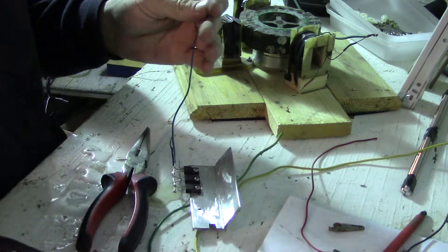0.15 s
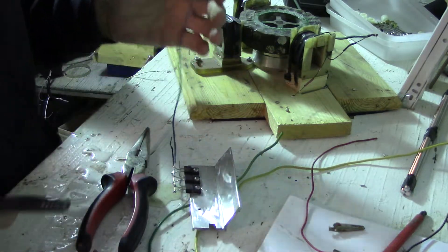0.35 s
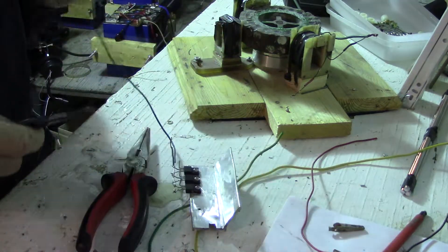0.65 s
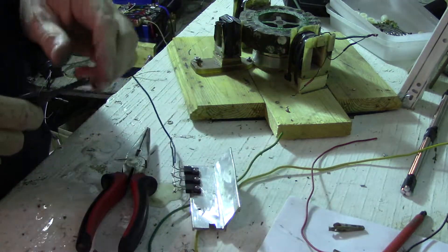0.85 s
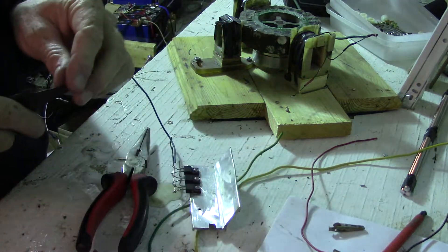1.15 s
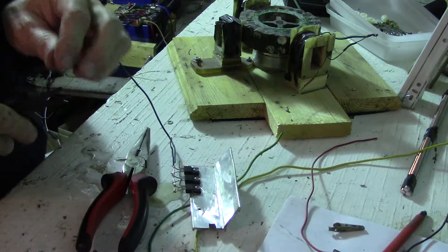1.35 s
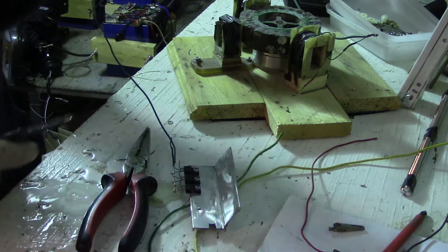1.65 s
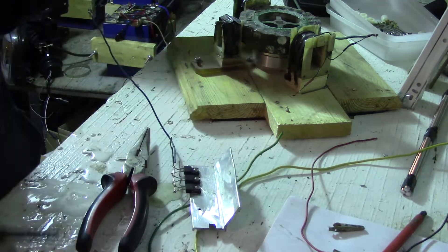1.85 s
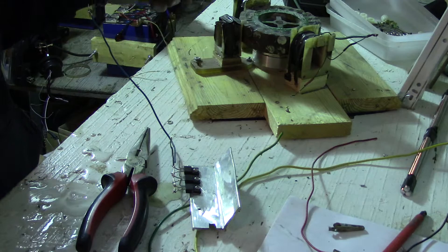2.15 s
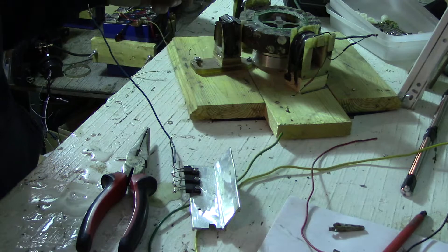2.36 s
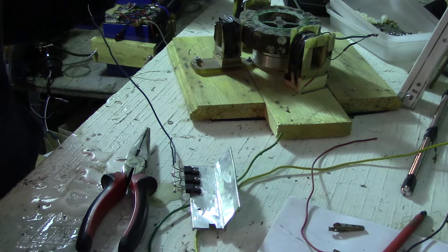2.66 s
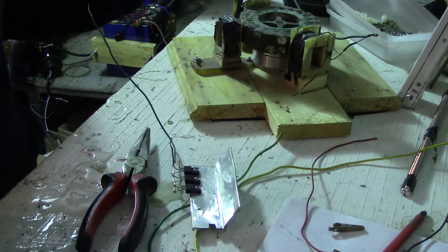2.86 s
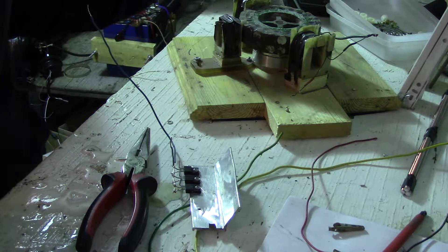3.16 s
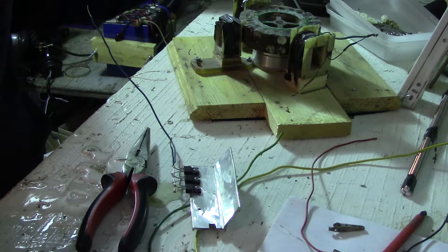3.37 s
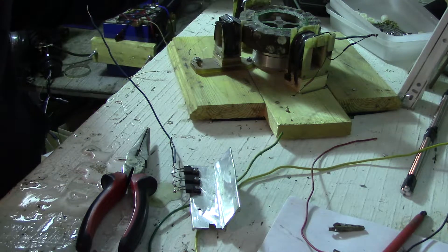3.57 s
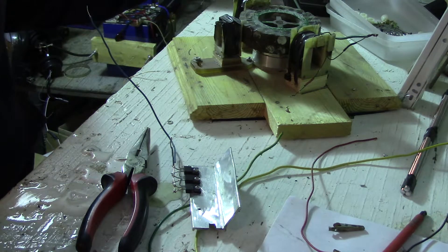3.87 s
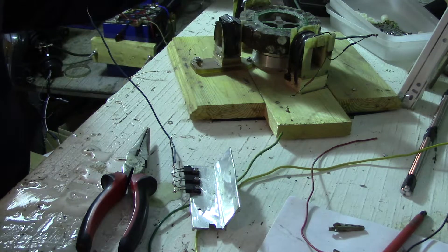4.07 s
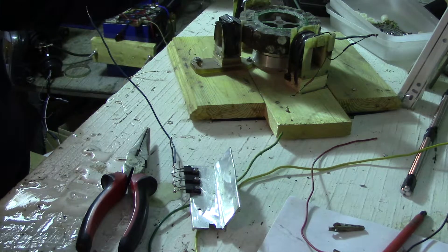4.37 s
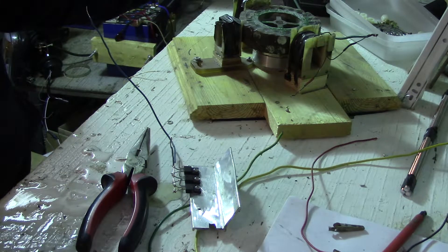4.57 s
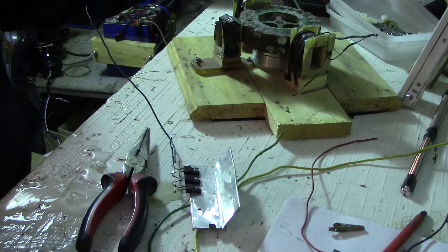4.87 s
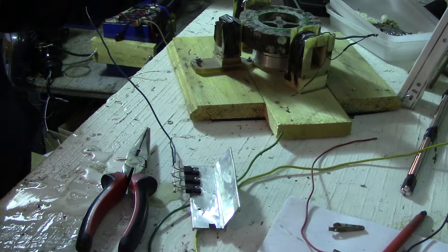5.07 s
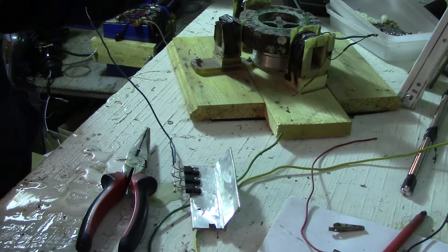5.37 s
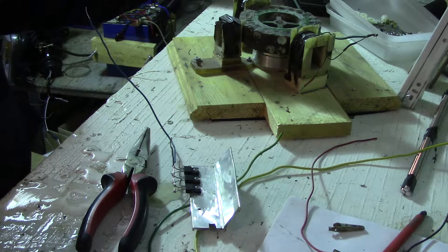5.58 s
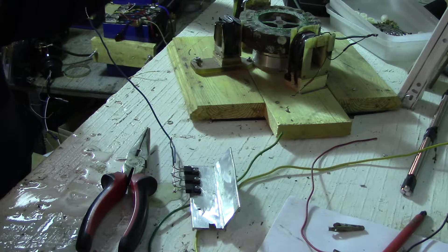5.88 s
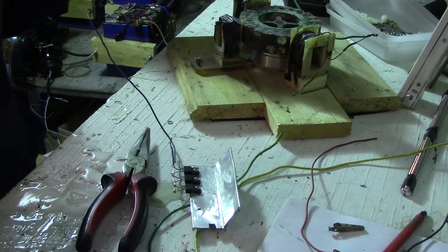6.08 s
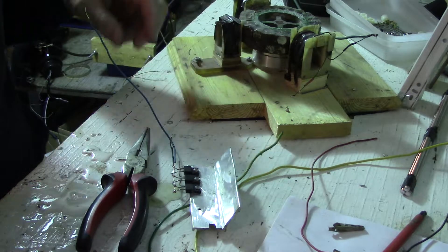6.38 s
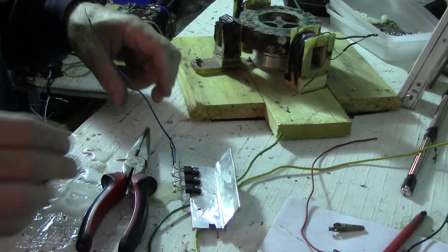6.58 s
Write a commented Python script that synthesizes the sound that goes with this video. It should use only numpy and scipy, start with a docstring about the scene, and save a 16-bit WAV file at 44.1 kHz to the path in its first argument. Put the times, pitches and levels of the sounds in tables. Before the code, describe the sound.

A transformer hums steadily while wire strippers snip and are put down, then a heavier tool drops and rattles on a workbench.

```python
"""Wire stripping at a workbench

Close up in a small room, a mains transformer hums and buzzes throughout. Hands and wire rub and
softly bump the bench, a sleeve brushes past. Wire strippers snip and are laid down, and wire ticks.
Near the end a heavier tool drops on the bench top, bounces and rattles to rest."""
import sys
import numpy as np
from scipy import signal
from scipy.fft import rfft, irfft
from scipy.io import wavfile

SR = 44100
rng = np.random.default_rng(int(sys.argv[2]) if len(sys.argv) > 2 else 0)


def master(y):
    """Save y as 16-bit WAV."""
    cut = np.clip(np.atleast_2d(y).T, -1, 1)
    pcm = np.round(cut * 32767)  # scale
    wavfile.write(sys.argv[1], SR, pcm.astype(np.int16))


N = 296793
T = np.arange(N) / SR
RING = T[:SR // 2]  # time axis of a single hit
TOP_HZ = 15500


def undb(db):
    """Decibels to gain."""
    return 10 ** (np.asarray(db) / 20)


def attack_unit(x):
    """Scale to rms 1 over the first 10 ms."""
    return x / np.std(x[:SR // 100])


def fade(t60):
    """Exponential decay, 60 dB down after t60 seconds."""
    return np.exp(-np.log(1000) * RING / t60)


def soften(x, hz):
    """Low-pass: a softer contact passes less treble."""
    return signal.sosfilt(signal.butter(2, min(hz, SR / 2 - 500), fs=SR, output="sos"), x)


def band(x, low_hz, high_hz):
    """Band-pass: a small contact gives little bass, a soft one little treble."""
    return soften(signal.sosfilt(signal.butter(2, low_hz, "high", fs=SR, output="sos"), x), high_hz)


def colour_db(curve, hz):
    """Read an EQ curve on a log-frequency axis."""
    points_hz, db = np.transpose(curve)
    return np.interp(np.log(hz + 1), np.log(points_hz), db)


def colour(x, curve, size=2048):
    """Causal EQ, built from the cepstrum of the curve's log gain."""
    gain = undb(colour_db(curve, np.fft.rfftfreq(size, 1 / SR)))
    cepstrum = irfft(np.log(gain))
    cepstrum[1:size // 2] *= 2
    cepstrum[size // 2 + 1:] = 0
    impulse = irfft(np.exp(rfft(cepstrum)))
    return signal.fftconvolve(x, impulse)[:len(x)]


def noise(curve):
    """A scene-long noise bed of rms 1, shaped by an EQ curve."""
    bed = colour(rng.standard_normal(N), curve)
    return bed / np.sqrt(np.mean(bed ** 2))


def add(track, s, x):
    """Mix a sound into the track at time s."""
    start = max(int(s * SR), 0)
    track[start:start + len(x)] += x[:max(N - start, 0)]


def bounces(s, gap_s, ratio, count):
    """Times of repeated contacts: each gap is the one before times the ratio."""
    return s + np.append(0, np.cumsum(gap_s * ratio ** np.arange(count - 1)))


def ring(modes, wash, wash_db, wash_t60, crack_db, crack_t60):
    """One hit on an object: clear modes over a wash of dense ones that opens with a short crack."""
    tones = sum(undb(db) * np.sin(2 * np.pi * hz * RING) * fade(t60) for hz, db, t60 in modes)
    tones = band(tones, 0.74 * modes[0][0], 2 * modes[-1][0])  # little radiates outside the modes' range
    burst = rng.choice([-1, 1], len(RING)) * (fade(wash_t60) + undb(crack_db) * fade(crack_t60))
    return attack_unit(attack_unit(tones) + undb(wash_db) * attack_unit(colour(burst, wash)))


# The hum's strong partials: (harmonic number, level [dB])
HUM_PARTIALS = [(1, -79), (2, -62), (4, -66), (5, -76), (6, -77), (7, -81), (8, -64), (9, -61), (10, -61),
                (11, -68), (13, -73), (14, -74), (15, -72), (16, -66), (19, -67), (21, -77), (24, -74),
                (25, -78), (26, -74), (29, -73), (30, -71), (31, -76), (32, -75), (33, -79), (36, -72),
                (43, -75), (48, -78), (53, -75)]
# The fine buzz between and above them: (frequency [Hz], level per partial [dB])
BUZZ_CURVE = [(120, -81), (1500, -80), (2400, -81), (4000, -85), (6000, -88), (7500, -97), (10000, -104),
              (12300, -108), (13050, -89), (13350, -101), (13650, -93), (14100, -93), (14500, -102),
              (15500, -108)]
def transformer(hum_hz=120.02, dispersion=1.3, waver_db=.5):
    """The core flexes twice a mains cycle; its plates delay each partial differently, smearing it."""
    harmonics = np.arange(1, int(TOP_HZ / hum_hz))
    db = colour_db(BUZZ_CURVE, harmonics * hum_hz) + 2 * rng.standard_normal(len(harmonics))
    for harmonic, partial_db in HUM_PARTIALS:
        db[int(harmonic) - 1] = partial_db
    phase = np.cumsum(np.cumsum(dispersion + .4 * rng.standard_normal(len(harmonics))))
    cycle_at = np.linspace(0, 1, SR // 10)
    cycle = np.sqrt(2) * undb(db) @ np.cos(2 * np.pi * np.outer(harmonics, cycle_at) + phase[:, None])
    waver = np.interp(T, np.linspace(0, T[-1], 20), rng.standard_normal(20))
    return np.interp(T * hum_hz % 1, cycle_at, cycle) * undb(waver_db * waver)


# Room tone in the mid and in the side: (frequency [Hz], relative level [dB])
MID_AIR_EQ = [(30, 9.5), (80, -4), (220, 3.5), (500, 0.5), (1000, -4), (1400, -4), (1800, -8.5), (2300, -7),
              (3500, -12.5), (7000, -15.5), (11000, -23.5), (15500, -26)]
SIDE_AIR_EQ = [(30, 2), (300, 13), (1200, 5), (5000, -6), (15000, -31)]
def room_tone():
    """A faint, steady bed of air, as mid and side."""
    return undb(-59.5) * noise(MID_AIR_EQ), undb(-67.5) * noise(SIDE_AIR_EQ)


# The bench top's low boom: (frequency [Hz], relative level [dB], t60 [s])
BENCH_MODES = [(140, -6.5, 0.24), (180.7, -2, 0.18), (188.8, 16, 0.2), (207, -11, 0.23)]
# Its dense modes under a hand: (frequency [Hz], relative level [dB])
THUD_WASH = [(30, -5), (150, -3), (320, 0), (420, -2.5), (620, -4), (760, -14), (950, -20), (2000, -23),
             (6000, -44)]
def hand_bumps():
    """A soft hand meets the bench with a dull thud and settles in ever lighter touches."""
    out = np.zeros(N)
    first_db, loss_db = -34, 7
    for k, s in enumerate(bounces(.001, gap_s=.017, ratio=2.8, count=3)):
        thud = ring(BENCH_MODES, THUD_WASH, wash_db=7, wash_t60=0.2, crack_db=-10, crack_t60=.04)
        add(out, s, undb(first_db - loss_db * k) * thud)
    return soften(out, hz=1800)


# Rubs and soft low bumps: (time [s], length [s], level [dB], band centre [Hz])
TOUCH_CUES = [(.103, 0.024, -50, 480), (0.27, .036, -51.5, 385), (.395, .032, -53, 280),
              (2.942, 0.03, -57.5, 170), (4.337, 0.073, -48, 423), (4.402, 0.025, -47.5, 338),
              (6.054, 0.046, -43, 75)]
# The tone of these touches: (frequency [Hz], relative level [dB])
TOUCH_EQ = [(30, 11), (100, -6.5), (190, 2.5), (270, -2), (400, -1), (650, -9.5), (1400, -2.5), (2200, -5),
            (5000, 8), (12000, -14)]
def rubs_and_soft_bumps(grains_per_s=300, steady_level=0.73, width_octaves=2.3):
    """Short rubs and soft low bumps of hands and wire on the bench top, as bands of grainy noise."""
    out, edge = np.zeros(N), 2 ** (width_octaves / 2)
    for s, length, db, hz in TOUCH_CUES:
        pressure = np.sqrt(np.sin(np.pi * np.minimum(RING / length, 1)).clip(0))
        onsets = rng.random(len(RING)) < grains_per_s / SR
        grains = signal.lfilter([1], [1, -np.exp(-grains_per_s * 2 / SR)], onsets)
        touch = colour(rng.standard_normal(len(RING)) * (steady_level + grains) * pressure, TOUCH_EQ)
        for _ in range(2):  # a small, soft contact: both edges fall away steeply
            touch = band(touch, hz / edge, hz * edge)
        add(out, s, undb(db) * touch / np.std(touch[:int(length * SR)]))
    return out


# Sleeve swells: (peak time [s], half length [s], level [dB])
SLEEVE_CUES = [(0.515, 0.14, -55), (1.17, 0.3, -64), (3.5, 0.053, -61), (4.367, 0.054, -58),
               (6.025, 0.021, -53.5)]
# The tone of the cloth: (frequency [Hz], relative level [dB])
CLOTH_EQ = [(200, -5), (600, 8.5), (2000, 6), (3500, -4), (6000, -3), (11000, -13), (15500, -27)]
def sleeve():
    """Cloth swishes in smooth swells as the arm moves."""
    swells = sum(undb(db) * np.exp(-.5 * ((T - s) / half) ** 2) for s, half, db in SLEEVE_CUES)
    return swells * noise(CLOTH_EQ)


# The bright ping of the strippers' jaws: (frequency [Hz], relative level [dB], t60 [s])
JAW_MODES = [(2220, 5, 0.036), (3020, 2, .03), (3480, 12, 0.025), (3920, -2, 0.022), (4000, -2, 0.027),
             (4120, -14, 0.021), (5580, -9, .02), (6640, 1, .015)]
# Their dense modes: (frequency [Hz], relative level [dB])
JAW_WASH = [(500, -1), (1600, -6), (2600, -7), (3400, -3.5), (5000, -10.5), (6700, -4.5), (7800, -11.5),
            (11000, -16), (12500, -19)]
def snap(low_hz, high_hz):
    """One crack that rings the jaws."""
    crack = ring(JAW_MODES, JAW_WASH, wash_db=7, wash_t60=.055, crack_db=14, crack_t60=.012)
    return attack_unit(band(crack, low_hz, high_hz))


# Snips and wire ticks: (time [s], level [dB], low cut [Hz])
SNIP_CUES = [(1.6654, -40, 2700), (3.0012, -51, 1000), (3.0125, -48.5, 750), (3.805, -64, 4000),
             (3.895, -64, 4000)]
def snips(tear_gap_s=.0032, tear_db=-9, loss_db=2):
    """Insulation gives way with a snap, then tears on in smaller, duller, uneven cracks."""
    out = np.zeros(N)
    for s, db, low_hz in SNIP_CUES:
        add(out, s, undb(db) * snap(low_hz, high_hz=8000))
        lags = np.cumsum(tear_gap_s * rng.uniform(.75, 1.4, size=3))
        for k, lag in enumerate(lags):
            add(out, s + lag, undb(db + tear_db - loss_db * k) * snap(low_hz, high_hz=5000))
    return out


# The ring of steel parts: (frequency [Hz], relative level [dB], t60 [s])
CLINK_MODES = [(1020, -2, .08), (1270, -6, .07), (1360, -6, .07), (1680, -2, .06), (1745, -6, .06),
               (2207, 0, .042), (2275, -5, .035), (2610, -14, .045), (2960, -13, .05), (3970, -17, .06),
               (5790, -19, .04), (11230, -28, .04), (11410, -26, .04), (11660, -29, .04)]
# Their dense modes: (frequency [Hz], relative level [dB])
CLINK_WASH = [(300, -36), (1000, 13), (2200, -1.5), (3200, -14), (6000, -21), (10000, -29), (11500, -29),
              (13000, -54), (16000, -51)]
def steel_clink():
    """A tool's steel parts ring briefly when struck."""
    return ring(CLINK_MODES, CLINK_WASH, wash_db=4.5, wash_t60=0.078, crack_db=8, crack_t60=0.023)


# The knock of the strippers' handles: (frequency [Hz], relative level [dB], t60 [s])
HANDLE_MODES = [(135, -12, .18), (233, 0, .19), (603, 1, .11), (694, -4, .1), (813, -5, .1), (921, -6, .07),
                (1175, -2, .09), (1249, -8, .1), (1490, -2, .08), (1620, -8, .08), (2240, -11, .06)]
# Their dense modes: (frequency [Hz], relative level [dB])
HANDLE_WASH = [(40, -35), (150, -1), (420, -6.5), (700, 7), (1400, -3.5), (2400, -11.5), (4000, -27.5),
               (12000, -45.5)]
def strippers_laid_down(at_s=2.0012, jaw_lead_s=.0046, grip_t60=.34, loss_db=2.5):
    """The jaws touch first, then the handles knock and rock ever more slowly and softly to rest."""
    out = np.zeros(N)
    add(out, at_s - jaw_lead_s, undb(-34) * steel_clink())
    for k, s in enumerate(bounces(at_s, gap_s=.0088, ratio=1.55, count=4)):
        knock = ring(HANDLE_MODES, HANDLE_WASH, wash_db=4, wash_t60=0.12, crack_db=0, crack_t60=0.053)
        knock *= fade(grip_t60)  # the holding hand damps the ring
        contact = undb(-22.5) * knock + undb(-34.5) * steel_clink()
        add(out, s, undb(-loss_db * k ** 2) * contact)
    return out


# The clunk of the heavy tool's body: (frequency [Hz], relative level [dB], t60 [s])
TOOL_MODES = [(431, -10, .15), (475, -2, .14), (540, -1, .14), (586, 0, .13), (690, 0, .11),
              (800, -12, .06), (916, -9, .13), (988, -9, .11), (1022, -7, .12), (1147, -15, .08),
              (1235, -12, .12), (1492, -17, .1)]
# Dense modes of that body and of the bench under it: (frequency [Hz], relative level [dB])
TOOL_WASH = [(60, -38), (310, -19), (480, 0.5), (680, -2), (850, -8), (1200, -8.5), (2000, -22),
             (4000, -36), (9000, -50.5), (15000, -69)]
THUMP_WASH = [(30, -36), (90, -18), (180, 4.5), (330, 3.5), (600, 0.5), (1500, -71)]
def tool_contact(bench_db, body_db, steel_db, hard_db=-12.5, hard_hz=15000, hardening=0.33):
    """One contact shakes the bench top, knocks the tool's body and clinks its steel."""
    thump = ring(BENCH_MODES, THUMP_WASH, wash_db=-8, wash_t60=0.26, crack_db=-16, crack_t60=0.035)
    clunk = ring(TOOL_MODES, TOOL_WASH, wash_db=-2, wash_t60=.16, crack_db=3, crack_t60=.04)
    # a lighter touch of the steel stays in contact longer and sounds duller
    clink = soften(steel_clink(), hard_hz * undb(hardening * (steel_db - hard_db)))
    return undb(bench_db) * thump + undb(body_db) * clunk + undb(steel_db) * clink


# Landings: (time [s], bench [dB], body [dB], steel [dB], rattle length [s], rattle level [dB])
LANDING_CUES = [(6.125, -24.5, -8, -32, .011, -24), (6.19, -32, -24, -52, 0, -40),
                (6.205, -18.5, -26, -30, 0, -40), (6.2344, -24, -8.5, -43, .029, -16),
                (6.2959, -25, -31, -23.5, 0, -40), (6.305, -30, -15, -12, .011, -24.5),
                (6.36, -24.5, -27.5, -36.5, .029, -38)]
def dropped_tool(loss_db=0.5):
    """The tool bounces; some landings trail a rattle of contacts, each sooner and weaker."""
    out = np.zeros(N)
    for s, bench_db, body_db, steel_db, rattle_s, rattle_db in LANDING_CUES:
        add(out, s, tool_contact(bench_db, body_db, steel_db))
        for k, at in enumerate(bounces(s, gap_s=.0074, ratio=.94, count=6)[1:]):
            if at < s + rattle_s:
                db = rattle_db - loss_db * k
                add(out, at, tool_contact(bench_db=db - 6.5, body_db=db, steel_db=db - 3.5))
    return out


def room(x, db, t60_low, t60_high):
    """Diffuse echoes of the cluttered workshop, with one decay below 1 kHz and one above."""
    hiss = rng.standard_normal(len(RING))
    low = soften(hiss, 1000)
    build_up = np.clip(RING / 0.015 - .5, 0, 1)
    tail = (low * fade(t60_low) + (hiss - low) * fade(t60_high)) * build_up
    return undb(db) * signal.fftconvolve(x, tail / np.linalg.norm(tail))[:N]


# Stereo width, as EQ on the side echoes: (frequency [Hz], gain [dB])
WIDTH_EQ = [(120, -57), (500, -30), (1000, -26.5), (2000, -16), (4000, -17.5), (12000, -16)]
def scene(tool_spread_db=2.5, balance_db=-.5):
    """A close, nearly central mid/side mix, widest in the treble and on the dropped tool."""
    tool, hum = dropped_tool(), transformer()
    hands = strippers_laid_down() + snips() + hand_bumps() + rubs_and_soft_bumps() + sleeve()
    reverb = room(tool + hands, db=-12, t60_low=0.22, t60_high=0.21)
    mid_air, side_air = room_tone()
    mid = tool + hands + reverb + hum + mid_air
    echoes = room(undb(tool_spread_db) * tool + hands + hum, db=-4, t60_low=0.08, t60_high=0.09)
    side = colour(echoes, WIDTH_EQ) + side_air
    return np.array([(mid + side) * undb(balance_db / 2), (mid - side) * undb(-balance_db / 2)])


def record(dry, low_cut_hz=85):
    """Master chain: thin the bass, round the loudest peaks, cut the top."""
    thin = signal.sosfilt(signal.butter(2, low_cut_hz, "high", fs=SR, output="sos"), dry)
    rounded = thin / (1 + thin ** 4) ** (1 / 4)
    return signal.sosfilt(signal.ellip(10, .1, 80, TOP_HZ, fs=SR, output="sos"), rounded)


dry = scene()
out = record(dry)
master(out)
```